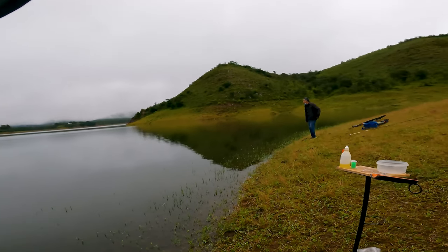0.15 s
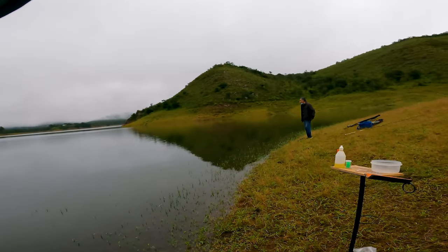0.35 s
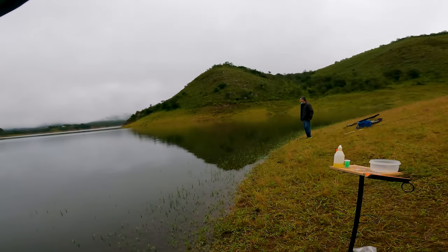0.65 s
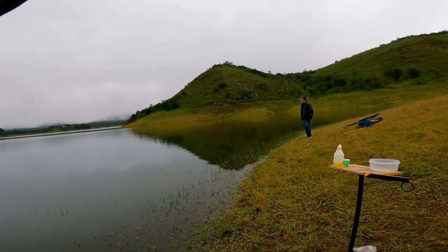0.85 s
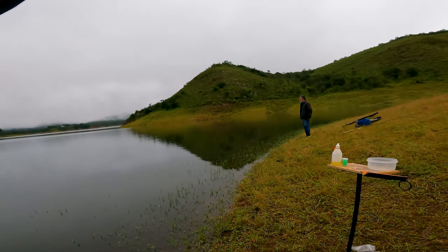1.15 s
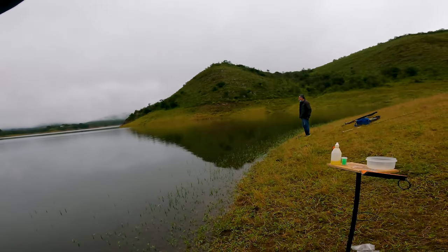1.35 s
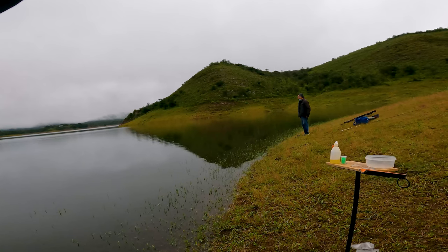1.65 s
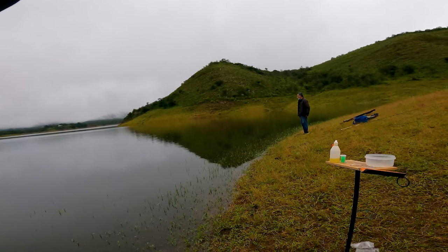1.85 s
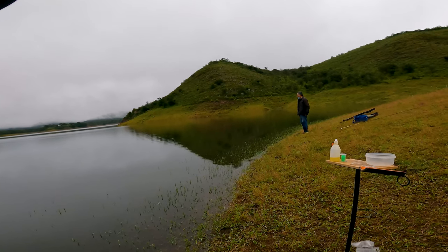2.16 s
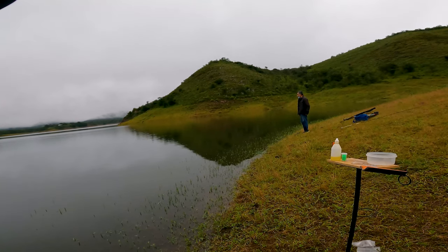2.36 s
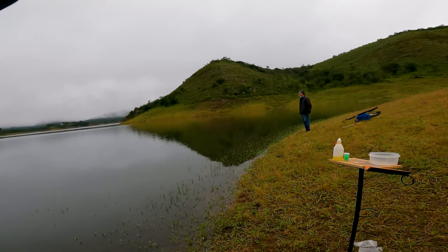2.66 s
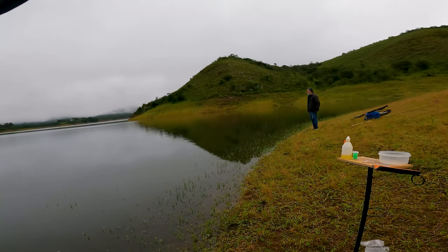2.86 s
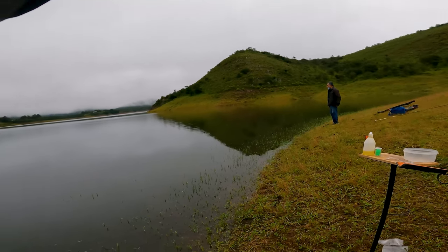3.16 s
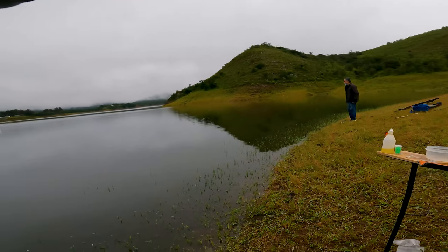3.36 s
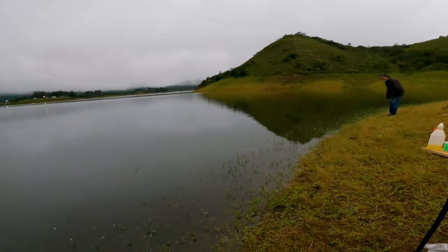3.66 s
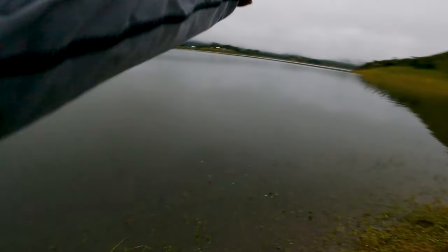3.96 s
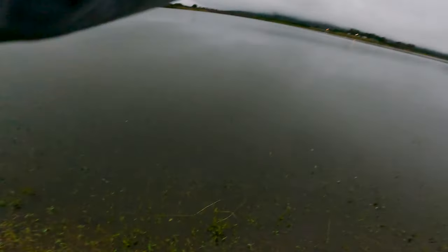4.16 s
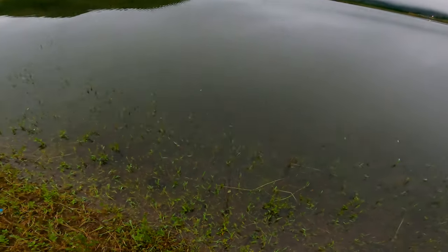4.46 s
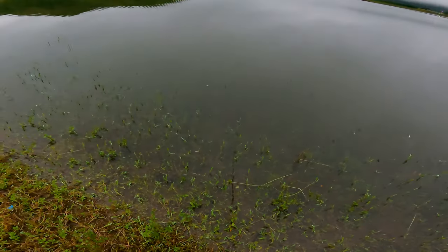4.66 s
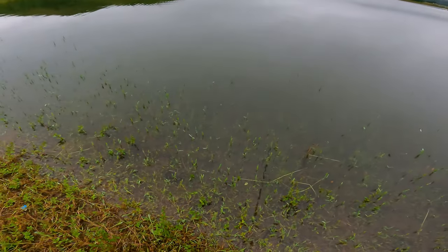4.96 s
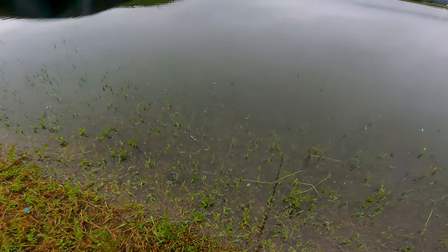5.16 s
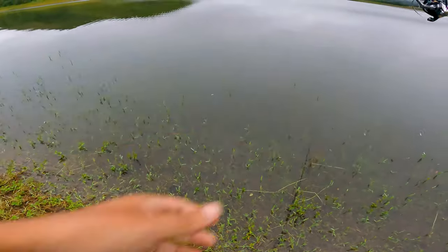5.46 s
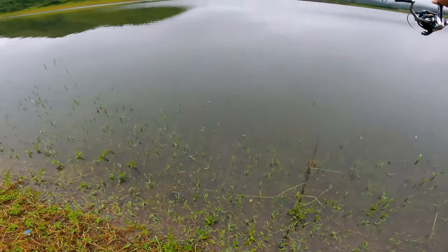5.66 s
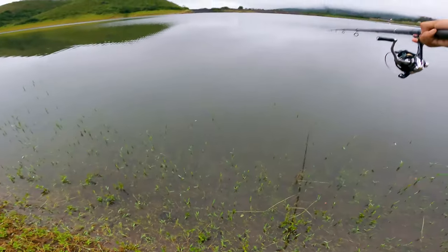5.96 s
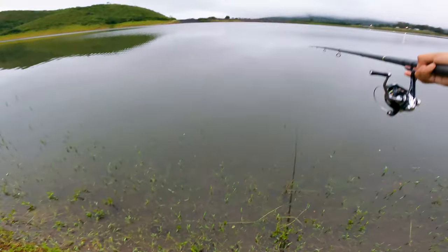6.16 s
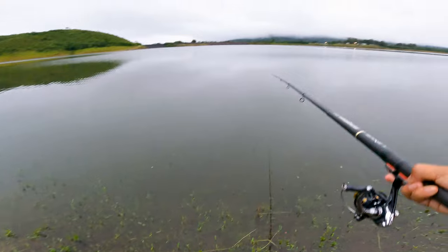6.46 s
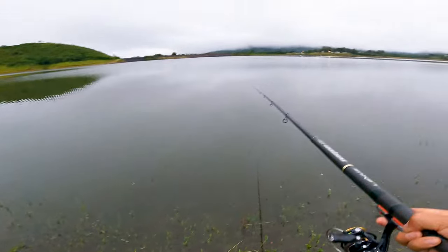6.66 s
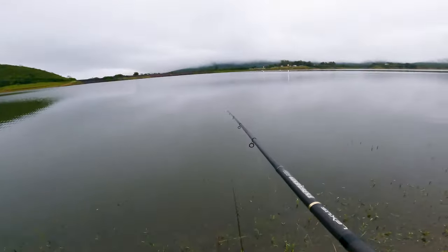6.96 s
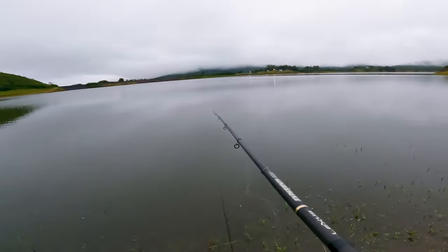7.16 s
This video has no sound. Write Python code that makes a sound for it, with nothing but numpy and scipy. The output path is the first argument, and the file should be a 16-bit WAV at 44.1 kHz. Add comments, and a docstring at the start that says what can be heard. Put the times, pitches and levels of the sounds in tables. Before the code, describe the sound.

A fishing rod swishes in a cast, line hisses out and a sinker plops into water, amid insects and light wind.

```python
"""A cast from a lake shore

A sleeve rustles, the rod whistles as it sheds vortices, and line hisses off the spool through the rings.
The hiss sinks in pitch as the line slows, and the sinker plops into the water in ringing bubbles.
Insects scrape their wings in the grass, far birds whistle, and wind nudges a body-worn microphone."""
import sys
import numpy as np
from scipy import signal
from scipy.fft import rfft, irfft, next_fast_len
from scipy.io import wavfile
from scipy.ndimage import map_coordinates

SR = 44100
rng = np.random.default_rng(int(sys.argv[2]) if len(sys.argv) > 2 else 0)


def generate_wav(sig):
    """Save sig (samples, or channels by samples) to the path in sys.argv[1] as 16-bit PCM at SR."""
    pcm = np.round(np.clip(np.atleast_2d(sig).T, -1, 1) * 32767).astype(np.int16)
    wavfile.write(sys.argv[1], SR, pcm)


N = 321914
T = np.arange(N) / SR

# the rod's air whistle, climbing with its speed: time_s, pitch_hz
SWING = [(3.97, 440), (4.03, 778), (4.055, 936), (4.068, 1210), (4.11, 1790), (4.13, 2370), (4.147, 3450)]
# butt, middle and tip sweep past: start_s, hold_s, level_db
SWEEPS = [(4.016, .036, -41.5), (4.064, .035, -35), (4.134, .013, -38)]
# the rod passes on the right, then ahead: time_s, left_lag_s
BEARING = [(4.03, 0.000056), (4.08, .00012), (4.12, 0.000099), (4.15, 0.000027)]


def rod_whistle():
    """The rod sheds vortices at a pitch set by its speed, lower where thick and higher where thin."""
    hz, = curves(SWING)
    tip = fuzzy_tone(hz, spread=.14, width=.11)
    taper = sum(fuzzy_tone(hz * ratio, spread=.22, width=.2) for ratio in (.87, 1.1, 1.36))
    shaft = unit(taper * flicker(3, 160))
    passing = swells(SWEEPS, rise_s=.036, fall_s=.046)
    left, right = (vortex_notes() + passing * (amp(-7) * tip + amp(-2) * shaft)) * pan(-1.7)
    lag_s, = curves(BEARING)
    return np.array([map_coordinates(left, [(T - lag_s) * SR], order=3), right])


# notes of the rod's sections, butt to tip: time_s, level_db, pitch_hz, length_s
ROD_NOTES = [(4.03, -41, 750, .04), (4.067, -28.5, 1098, .026), (4.076, -32, 1300, .036),
             (4.086, -30, 1672, .036), (4.097, -29, 1449, .012), (4.1, -33, 1810, .016),
             (4.117, -34, 1880, .022), (4.133, -29, 2450, .015), (4.147, -30, 3424, .02),
             (4.174, -32, 2280, .011), (4.186, -31, 1910, .022)]


def vortex_notes():
    """Vortices lock onto the moving rod for a moment, each time a nearly pure, slightly rising note."""
    out, t = np.zeros(N), np.arange(-SR // 10, SR // 10) / SR
    glide_per_s = 1.2  # share of the pitch
    for (s, db, hz, length_s), phase in zip(ROD_NOTES, rng.uniform(0, 2 * np.pi, len(ROD_NOTES))):
        tone = np.sin(2 * np.pi * hz * (t + glide_per_s * t * t / 2) + phase)
        add(out, s - .1, amp(db) * np.exp(-(2 * t / length_s) ** 2) * tone)
    return out * flicker(1.2, 250)


# whooshes of arm, tip and follow-through: start_s, hold_s, hiss_db, body_db
WHOOSHES = [(4.05, .065, -41.7, -43.5), (4.157, .027, -34.3, -32.3), (4.3, .1, -59, -53.5)]
# colour of their hiss: freq_hz, gain_db
WHOOSH_EQ = [(1000, -15), (2000, -4), (2700, -8), (4000, -12), (5500, -10), (7200, -9.5), (9300, -16),
             (10500, -18), (13000, -19.5), (15500, -47)]
# thumps of air pushed by the arm: time_s, level_db, pitch_hz
DRAUGHTS = [(3.93, -36, 182), (3.978, -29.5, 168), (4.043, -26.5, 100), (4.082, -33, 120),
            (4.182, -12.5, 170)]


def whoosh():
    """Air rushes past the arm and rod, and the arm's draught hits the microphone."""
    hiss, body = layered_swells(WHOOSHES, rise_s=.07, fall_s=.135)
    hiss = hiss * eq_noise(WHOOSH_EQ, width=.63) * flicker(1.8, 300)
    body_eq = [(150, 1), (400, 1), (650, -1.5), (950, 1.5), (1600, -5.5)]
    body = amp(-5) * body * eq_noise(body_eq, width=.6) * flicker(1.8, 120)
    draught = amp(-3.5) * thumps(DRAUGHTS, fade_cycles=1.19, left_db=-13.5)
    return hiss + body + draught * [[-1], [1]]  # it presses on one side and sucks at the other


# resonances of line in the rings: pitch_hz, bandwidth_hz, gain_db
RING_MODES = [(1890, 67, 0), (2480, 290, -11.5), (3640, 29, -20), (5330, 200, -6.5), (5880, 78, -4),
              (6200, 290, -7), (6640, 130, -13), (9000, 470, -8)]


def release():
    """The taut line zips as the rod loads; freed, it tears through the rings and makes them sing."""
    def resonances(f):
        return sum((-1) ** k * amp(db) * 1j * f * band / (hz * hz - f * f + 1j * f * band)
                   for k, (hz, band, db) in enumerate(RING_MODES))

    taut = swell(4.045, hold_s=.035, level_db=-52, rise_s=.04, fall_s=.05)
    freed = swell(4.15, hold_s=.042, level_db=-31.3, rise_s=.04, fall_s=.038)
    zipping = taut * fuzzy_tone(11500, spread=.16, width=.6) * pan(3)
    return zipping + freed * noise(resonances, width=.56) * pan(-1.2)


# bursts of slack line: start_s, hold_s, level_db, pitch_hz
LOOPS = [(4.325, .005, -55, 620), (4.347, .03, -54, 620), (4.456, .03, -56, 640), (4.508, .012, -57, 850)]


def loose_loops():
    """The first loose loops flap through the rings in rough, rising bursts."""
    hz, = curves([(s, hz) for s, _, _, hz in LOOPS])
    bursts = swells([row[:3] for row in LOOPS], rise_s=.02, fall_s=.02)
    flaps_per_s = 65 * (1 + .25 * wobble(40))
    flapping = np.abs(sine(flaps_per_s / 2))  # two flaps a cycle
    return bursts * unit(flapping * fuzzy_tone(hz, spread=.3, width=.3))


# colour of the spool's hiss: freq_hz, gain_db
SPOOL_EQ = [(3500, -13), (5500, -12.5), (7300, -1.5), (8300, -2), (10000, -1.5), (12000, -1.5),
            (13500, -5.7), (15500, -20)]
# thin singing on the spool lip: start_s, hold_s, level_db, rise_s, fall_s
SHEENS = [(5.88, .12, -64.5, 1.2, .9), (6.45, .55, -62.5, .5, .1)]
# line rubs the rings at launch, in flight and as the rod dips: start_s, hold_s, level_db, rise_s, fall_s
RUBS = [(4.35, .02, -57.5, .1, .95), (5.3, .2, -64.5, 1, 1.5), (6.22, .25, -66.5, .5, .5),
        (6.62, .2, -63.5, .3, .7)]
# colour of that rub: freq_hz, gain_db
RUB_EQ = [(250, -8), (450, -7.5), (700, -8.5), (920, -10), (1080, -5), (1380, -3), (1900, -6.5),
          (2480, -4.2), (3000, -7.5), (4000, -11.5), (4950, -7.5), (6100, -11), (7200, -12.5), (9000, -30)]
LAUNCH_S, PULL_END_S = 4.3, 7.02
FLOWN_S = np.maximum(T - LAUNCH_S, 0)


def running_line():
    """Line flutters off the spool lip and rubs the rings as the sinker pulls it out."""
    flutter = flicker(1.7, 450) * flicker(.6, 40) * flicker(.4, 7)
    spool_db = -61.6 + .8 * FLOWN_S  # the lip hisses more as the spool empties
    running = swell(LAUNCH_S, PULL_END_S - LAUNCH_S, spool_db, rise_s=.1, fall_s=.19)
    hiss = running * eq_noise(SPOOL_EQ, width=.53) * pan(-.8)
    sheen = swells(SHEENS) * fuzzy_tone(11850, spread=.11, width=.6) * pan(6)
    rub = amp(3.8) * swells(RUBS) * eq_noise(RUB_EQ, width=.7) * flicker(1.9, 60) * flicker(.67, 11)
    fade_in = np.clip((T - LAUNCH_S) / .1 + 1, 0, 1)
    return fade_in * (flutter * (hiss + sheen + coils()) + rub + whirling_line())


def coils():
    """The coils' hiss sags in pitch, collapses once the pull ends, and closes with a chirp."""
    start_hz, end_hz, sag_hz_per_s, stall_s = 11800, 3000, 470, .102
    stall = np.exp(-np.maximum(T - PULL_END_S, 0) / stall_s)
    hz = end_hz + (start_hz - end_hz - sag_hz_per_s * FLOWN_S) * stall
    hiss = swell(6.75, hold_s=.27, level_db=-56.9, rise_s=1.7, fall_s=.23)
    chirp = swell(7.165, hold_s=.02, level_db=-65, rise_s=.1, fall_s=.03)
    return hiss * fuzzy_tone(hz, spread=.46, width=.6) + chirp * fuzzy_tone(hz, spread=.2, width=.4)


def whirling_line():
    """Coils whip the first ring with a rising whirr; the whirling line hums lower as it slows."""
    whirr_hz = 790 - 270 * np.exp(-FLOWN_S / .15)
    whipping = swell(4.34, hold_s=.13, level_db=-62, rise_s=.06, fall_s=.6)
    whirr = whipping * fuzzy_tone(whirr_hz, spread=.4, width=.24) * flicker(3.2, 45)
    hum_hz = (160 + 174 * np.exp(-FLOWN_S / .55)) * (1 + .028 * wobble(20))
    whirling = swell(4.64, hold_s=.15, level_db=-60.5, rise_s=.45, fall_s=1.45)
    return whirr + whirling * sine(hum_hz) * flicker(2.2, 35) * pan(2.5)


# the sinker's bubbles: start_s, level_db, pitch_hz, t60_s
BUBBLES = [(7.2, -39, 258, 0.17), (7.211, -32, 219, 0.1), (7.228, -44.5, 338, .06),
           (7.228, -56, 990, 0.064)]


def splash():
    """The sinker slaps the water; its cavity pinches off into bubbles that rise in pitch."""
    slap = swell(7.211, hold_s=.01, level_db=-57, rise_s=.008, fall_s=.06)
    spray = eq_noise([(600, -4), (950, 4), (1800, 0), (2400, -12), (4000, -7), (7000, -24)], width=.45)
    return slap * spray + pings(BUBBLES, glide_per_s=8.4, attack_s=.0017, grit=.04)


# line and reel ticks: start_s, level_db
TICKS = [(3.472, -47.5), (3.9896, -38), (4.0055, -36), (4.016, -39), (4.0235, -41), (4.031, -37),
         (4.037, -38), (4.36, -43)]
# knocks on the rod: start_s, level_db, pitch_hz, t60_s
KNOCKS = [(4.443, -43, 540, .016), (5.282, -53, 1100, 0.13), (5.292, -55, 1240, .06),
          (5.322, -45, 2460, 0.038), (5.308, -55, 1080, .09), (5.395, -57, 1090, .08),
          (5.4, -55, 1415, 0.12), (5.402, -53, 3200, 0.027), (7.281, -47, 2350, 0.021),
          (7.281, -41.5, 336, 0.035)]


def tackle():
    """The reel ticks under load and the rod knocks in the hand."""
    ticks, t = np.zeros(N), np.arange(SR // 50) / SR
    for s, db in TICKS:
        add(ticks, s, amp(db - 3 - 60 * t / .0085))
    bright = eq_noise([(4000, -16), (6000, 13), (9000, 0), (12000, -9), (15000, -16)], width=.54)
    return ticks * bright + pings(KNOCKS, glide_per_s=0, attack_s=.00021, grit=.14)


# strokes of the sleeve: start_s, hold_s, rustle_db, brush_db
SLIDES = [(3.33, .12, -81, -71.5), (3.478, .02, -70.5, -74), (3.53, .035, -61, -68.5),
          (3.64, .26, -68.5, -62.5), (3.972, .06, -63, -48), (5.06, .04, -64.5, -76), (5.3, .11, -69, -62)]
# colour of the crisp rustle: freq_hz, gain_db
RUSTLE_EQ = [(1500, -23), (3500, 0.5), (6500, 2), (10000, -6.5), (14000, -14), (16000, -41)]
# colour of the dull brush: freq_hz, gain_db
BRUSH_EQ = [(150, 11), (350, -3), (800, -8.5), (1300, 0), (1900, -4), (4000, -11.5)]
# hollow scrapes of the jacket: start_s, hold_s, level_db, rise_s, fall_s
SCRAPES = [(3.36, .07, -71.5, .17, .75), (6.22, .3, -71.5, .3, .3), (6.62, .12, -69, .25, .35)]


def sleeve():
    """Jacket cloth slides as the arm lifts the rod, and again as it comes down."""
    rustle, brush = layered_swells(SLIDES, rise_s=.09, fall_s=.17)
    rustle = amp(5.5) * rustle * eq_noise(RUSTLE_EQ, width=.57) * pan(1.5)
    brush = brush * eq_noise(BRUSH_EQ, width=.69)
    scrape = swells(SCRAPES) * fuzzy_tone(1305, spread=.3, width=.53) * pan(4)
    return (rustle + brush) * flicker(1, 120) + scrape


# low rumbles of the jacket: start_s, hold_s, level_db, rise_s, fall_s
SHIFTS = [(4.3, .12, -59, .1, .1), (5.3, .5, -66.5, .4, .5), (6.15, .35, -69, .2, .3),
          (6.68, .45, -62.5, .15, .4)]
# soft bumps: time_s, level_db, pitch_hz
BUMPS = [(5.13, -56, 200), (5.265, -54, 190), (5.352, -53, 160), (5.44, -55, 190), (6.095, -52, 195),
         (6.3, -52, 190), (6.345, -57, 190), (6.415, -55.5, 195), (6.545, -57, 180), (6.835, -53, 190),
         (7.09, -56, 180), (7.155, -55, 200)]


def handling():
    """The jacket shifts and bumps against the microphone, mostly on its right side."""
    rumble = eq_noise([(110, -14), (150, 4.5), (215, 1.5), (320, -38)], width=.9)
    shifting = swells(SHIFTS) * rumble * pan(-7) * flicker(2.5, 25)
    return shifting + thumps(BUMPS, fade_cycles=1.3, left_db=-12)


# the lead insect's five-stroke phrases: start_s
LONG_PHRASES = [.9, 1.84, 2.01, 2.11, 2.35, 2.45, 2.54, 2.71, 2.88, 2.97, 3.3, 3.39, 3.56, 3.73]
LEAD_STROKES_PER_S, SOFT_START_DB = 64.55, 4.5


def phrasing(count):
    """Gain per wing stroke: phrases of four or five swell from a soft start, then rest one stroke."""
    gains = [1, 1, 0]
    while len(gains) < count:
        longer = np.any(np.abs(np.array(LONG_PHRASES) * LEAD_STROKES_PER_S - len(gains)) < 2)
        strokes = np.arange(5 if longer else 4)
        gains += [*amp(-SOFT_START_DB / 2 ** strokes), 0]
    return np.array(gains)


def insect(strokes_per_s, start_hz, end_hz, stroke_s, overtone_db, phrased=False):
    """Each wing stroke is a short tone that falls as the scraper slows."""
    strokes = np.abs(np.cumsum(strokes_per_s * np.ones(N)) / SR + .04 * wobble(20))
    index = strokes.astype(int)
    force, detune = rng.standard_normal((index.max() + 1, 2))[index].T
    progress = np.clip(strokes % 1 / strokes_per_s / stroke_s, 0, 1)
    hz = (start_hz + (end_hz - start_hz) * progress) * (1 + .0063 * detune)
    stress = phrasing(index.max() + 1)[index] if phrased else 1
    envelope = np.abs(np.sin(np.pi * progress ** .88)) ** 1.7 * amp(.7 * force) * stress
    return unit(envelope * (sine(hz) + amp(overtone_db) * sine(2 * hz)))


# fader on the near insects, shaded by the body as the angler turns: time_s, level_db
INSECT_FADER = [(0, -56.1), (3.36, -56), (3.44, -53), (3.8, -53), (3.83, -59), (3.97, -64), (4.6, -69),
                (6.9, -73), (7.3, -67.5)]
# the second insect's pace and strength: time_s, strokes_per_s, gain_db
SECOND_INSECT = [(0, 67, 0.5), (.5, 52.5, 0), (1.85, 49.5, -3), (2.1, 70, -4), (2.9, 69, -4),
                 (3.36, 58, -2), (3.42, 53, -14), (4.6, 53, -7)]


def insects():
    """Two near singers over the blur of many far ones."""
    pace, second_db = curves(SECOND_INSECT)
    lead = insect(LEAD_STROKES_PER_S, 5780, 4520, stroke_s=.0087, overtone_db=-24.5, phrased=True)
    second = insect(pace, 5520, 4440, stroke_s=.0115, overtone_db=-34)
    near = amp(-4.7) * (lead * pan(-5) + amp(second_db) * second * pan(-1.4))
    far = eq_noise([(4200, -18), (4650, -3), (5100, -1.5), (5500, -6), (6000, -19), (8000, -32),
                    (10200, -24), (11500, -36)], width=1)
    return amp(curves(INSECT_FADER)[0]) * near + amp(-66.8) * far


# the far bird's calls: start_s, level_db
CALLS = [(1.095, -72.5), (3.62, -65), (5.3, -60.5)]
# the fall of one call: offset_s, pitch_hz
CALL_PITCH = [(0, 4960), (.079, 4020), (.135, 3720), (.222, 3400), (.32, 2800)]


def whistling_bird():
    """A far bird repeats one thin falling whistle."""
    out = np.zeros(N)
    call = sine(curves(CALL_PITCH)[0]) * swell(.035, hold_s=.17, level_db=0, rise_s=.035, fall_s=.12)
    for s, db in CALLS:
        add(out, s, amp(db) * call[:int(CALL_PITCH[-1][0] * SR)])
    return out * flicker(2, 50)


# short bird notes: start_s, level_db, start_hz, end_hz
CHIPS = [(.89, -86, 4200, 3770), (1.07, -77, 4200, 3670), (1.5, -76, 3800, 4400), (1.56, -80, 4300, 3800),
         (2.04, -77, 1830, 1570)]


def small_birds():
    """Small birds slur short notes in the distance, and one trills."""
    out, progress = np.zeros(N), np.linspace(0, 1, SR // 25)
    for s, db, start_hz, end_hz in CHIPS:
        add(out, s, amp(db) * np.sin(np.pi * progress) * sine(start_hz + (end_hz - start_hz) * progress))
    trill_hz, fall_hz, notes_per_s = 3720, 420, 46
    note = notes_per_s * T % 1
    trill = unit(np.sin(np.pi * note) ** 2 * sine(trill_hz + fall_hz * (.5 - note)) * flicker(2.5, 40))
    return out + trill * swell(1, hold_s=.19, level_db=-86, rise_s=.12, fall_s=.1)


def hillside(call, t60_s, wet_db):
    """The hillside scatters a distant call into a short tail, different on each side."""
    t = np.arange(SR // 2) / SR
    tail = rng.standard_normal((2, len(t))) * amp(-60 * t / t60_s)
    echo = signal.fftconvolve(np.atleast_2d(call), tail / np.linalg.norm(tail[0]), axes=1)[:, :N]
    return call + amp(wet_db) * echo


# light gusts: start_s, hold_s, level_db
GUSTS = [(.14, .02, -60), (.45, .2, -66), (.97, .08, -60), (1.18, .15, -55), (1.43, .02, -53),
         (1.76, .27, -47), (2.31, .48, -48), (2.85, .12, -60), (3.34, .08, -60), (3.47, .04, -48),
         (3.69, .12, -52.5), (4.0, .2, -42), (4.27, .13, -54), (5.34, .06, -61), (5.69, .22, -65),
         (6.1, .3, -75), (6.72, .22, -60.5), (7.1, .2, -70)]
# colour of their rumble: freq_hz, gain_db
WIND_EQ = [(25, -33), (40, -12), (57, 0.5), (86, -2), (105, -6.5), (165, -19), (220, -31.5), (300, -44.5)]
# single eddies: time_s, level_db, pitch_hz
EDDIES = [(.617, -42, 80), (.975, -45, 80), (1.44, -42, 85), (1.69, -40, 80), (1.73, -37, 70),
          (1.775, -30, 85), (1.818, -27, 100), (1.895, -25, 72), (1.965, -33, 75), (2.003, -24.5, 102),
          (2.025, -29, 90), (2.322, -32, 95), (2.357, -29, 85), (2.539, -29, 76), (2.578, -27, 80),
          (2.652, -30, 90), (2.769, -28, 68), (2.797, -30, 75), (6.889, -31, 85)]


def wind():
    """Gusts rumble on the microphone, and each eddy shakes it for a few low cycles."""
    strength = amp(-86.5) + swells(GUSTS, rise_s=.08, fall_s=.1)
    gusts = strength * flicker(1.8, 22) * eq_noise(WIND_EQ, width=.23) * pan(-5.5)
    return gusts + amp(-4.5) * thumps(EDDIES, fade_cycles=.84, left_db=-5.5)


# colour of the open-air bed: freq_hz, gain_db
AIR_EQ = [(59, -26), (100, -9.5), (176, -5), (286, -14.5), (525, -21.5), (868, -25), (1270, -23.5),
          (2520, -33), (3800, -60), (4940, -59), (8360, -120)]


def lake_air():
    """Still air over the lake: a low hush under a faint hiss."""
    hiss_eq = [(2500, 5.5), (7000, 7.5), (9000, -6.5), (12000, -12.5), (14000, -36)]
    return amp(-72) * eq_noise(AIR_EQ, width=.82) + amp(-81.5) * eq_noise(hiss_eq, width=1)


def thumps(rows, fade_cycles, left_db):
    """Low tone bursts that fade in and out around their times."""
    out, t = np.zeros(N), np.arange(-SR // 10, SR // 10) / SR
    for (s, db, hz), phase in zip(rows, rng.uniform(0, 2 * np.pi, len(rows))):
        envelope = amp(db) * np.exp(-(t * hz / fade_cycles) ** 2)
        add(out, s - .1, envelope * np.sin(2 * np.pi * hz * t + phase))
    return out * pan(left_db)


def pings(rows, glide_per_s, attack_s, grit):
    """Damped tones with a noisy start; the glide is a share of the pitch."""
    out, t = np.zeros(N), np.arange(SR // 5) / SR
    for s, db, hz, t60_s in rows:
        tone = np.sin(2 * np.pi * hz * (t + glide_per_s * t * t / 2))
        scuff = grit * rng.standard_normal(len(t)) * amp(-60 * t / .0072)
        add(out, s, amp(db - 60 * t / t60_s) * (1 - np.exp(-t / attack_s)) * (tone + scuff))
    return out


def sine(hz):
    """A tone that follows a pitch curve."""
    return np.sin(2 * np.pi * np.cumsum(hz) / SR)


def fuzzy_tone(hz, spread, width):
    """Stereo noise around a steady or moving pitch; spread is bandwidth as a share of the pitch."""
    cycles = np.cumsum(hz * np.ones(N)) / SR
    knots, phase = cycles * spread, 2 * np.pi * cycles
    drift = lambda: map_coordinates(rng.standard_normal(int(knots[-1]) + 4), [knots], order=2)
    mid, side = [drift() * np.cos(phase) + drift() * np.sin(phase) for _ in range(2)]
    return unit(np.array([mid + width * side, mid - width * side]))


def noise(response, width):
    """Stereo noise of rms 1; width is side over mid."""
    mid, side = filtered(rng.standard_normal((2, N)), response)
    return unit(np.array([mid + width * side, mid - width * side]))


def eq_noise(eq, width):
    """Stereo noise coloured by (freq_hz, gain_db) points, 40 dB down an octave outside them."""
    f, db = np.transpose(eq)
    edges, levels = np.log(np.r_[f[0] / 2, f, f[-1] * 2]), np.r_[db[0] - 40, db, db[-1] - 40]
    return noise(lambda hz: amp(np.interp(np.log(hz + 1), edges, levels)), width)


def filtered(x, response):
    """Apply a frequency response."""
    size = next_fast_len(N + 8192)
    return irfft(rfft(x, size) * response(np.fft.rfftfreq(size, 1 / SR)), size)[..., :N]


def swell(start_s, hold_s, level_db, rise_s, fall_s):
    """Gain that rises until start_s, holds and falls; rise and fall are seconds per 20 dB."""
    outside = np.maximum(start_s - T, 0) / rise_s + np.maximum(T - start_s - hold_s, 0) / fall_s
    return amp(level_db - 20 * outside)


def swells(rows, **slopes):
    """One swell a row, summed in power."""
    return np.sqrt(sum(swell(*row, **slopes) ** 2 for row in rows))


def layered_swells(rows, **slopes):
    """Two gain curves with shared timing, one for each level column."""
    return [swells([(s, hold, db[layer]) for s, hold, *db in rows], **slopes) for layer in (0, 1)]


def curves(rows):
    """One value per sample for each column after the time."""
    times, *columns = np.transpose(rows)
    return [np.interp(T, times, column) for column in columns]


def wobble(rate_hz):
    """A smooth random curve, rate_hz knots a second."""
    return map_coordinates(rng.standard_normal(int(N * rate_hz / SR) + 4), [T * rate_hz], order=2)


def flicker(depth_db, rate_hz):
    """A gain that wavers at random."""
    return amp(depth_db * wobble(rate_hz))


def amp(db):
    """Decibels to gain."""
    return 10 ** (np.asarray(db) / 20)


def unit(x):
    """Scale to rms 1."""
    return x / np.sqrt(np.mean(x ** 2) + 1e-20)


def pan(left_db):
    """Channel gains for a left-minus-right level."""
    return amp(np.array([[left_db], [-left_db]]) / 2)


def add(track, start_s, sound):
    """Mix a sound into a track."""
    start = round(start_s * SR)
    track[..., start:start + sound.shape[-1]] += sound[..., :N - start]


def scene():
    """Shore, cast and landing."""
    birds = amp(-.5) * hillside(whistling_bird(), t60_s=.25, wet_db=-10)
    birds += amp(-1) * hillside(small_birds(), t60_s=.3, wet_db=-3)
    shore = lake_air() + wind() + insects() + birds
    cast = sleeve() + rod_whistle() + whoosh() + release() + loose_loops() + running_line()
    return shore + cast + tackle() + handling() + splash()


def record(dry):
    """The microphone keeps nothing above its band limit."""
    return filtered(dry, lambda hz: hz < 15660)


dry = scene()
out = record(dry)
generate_wav(out)
```